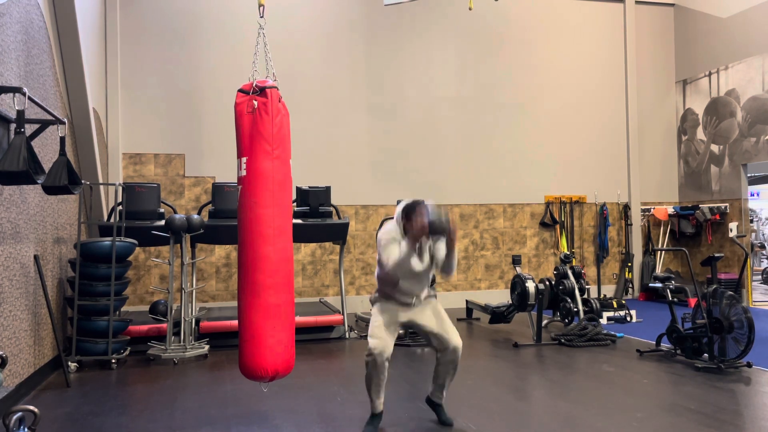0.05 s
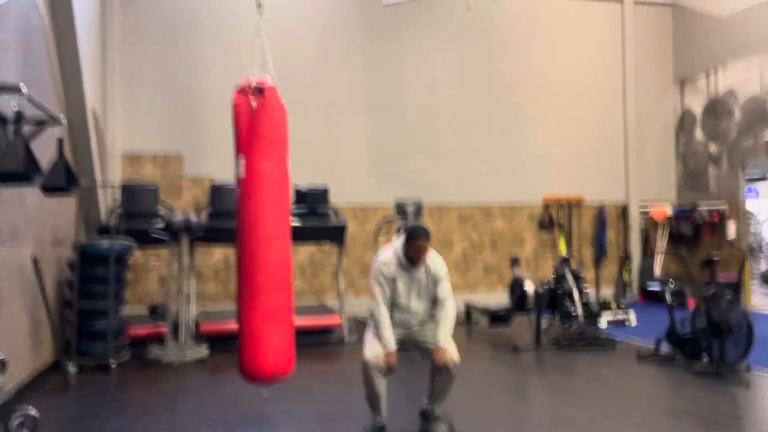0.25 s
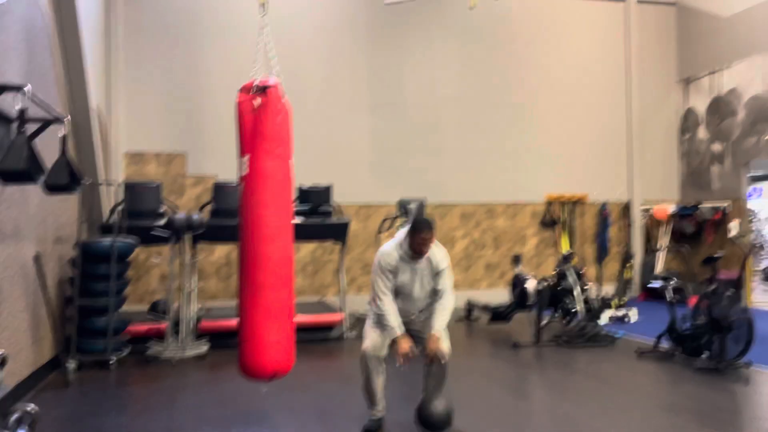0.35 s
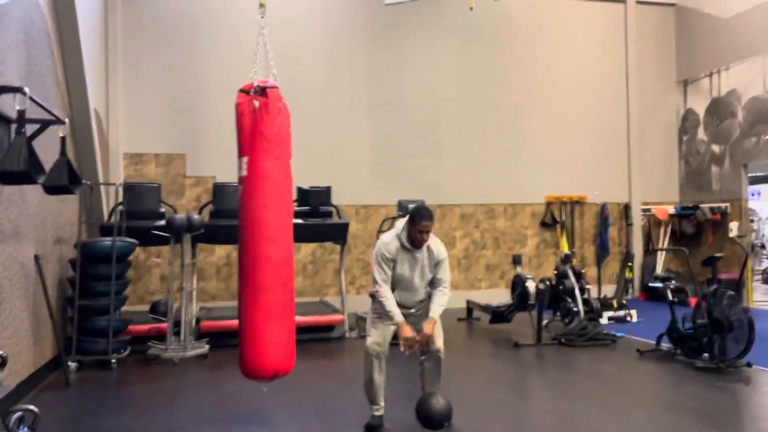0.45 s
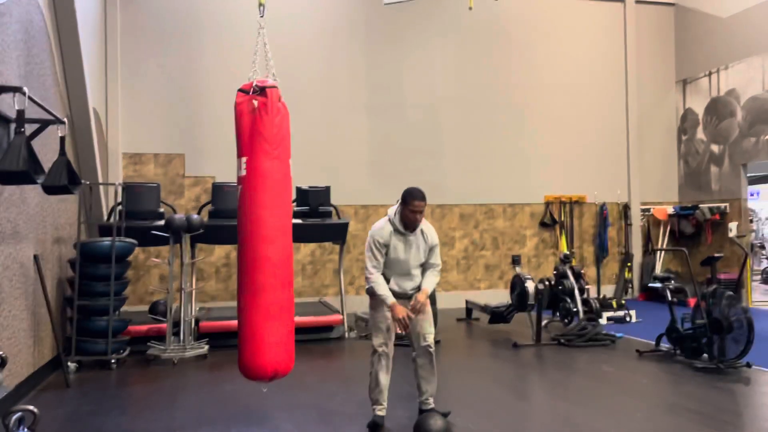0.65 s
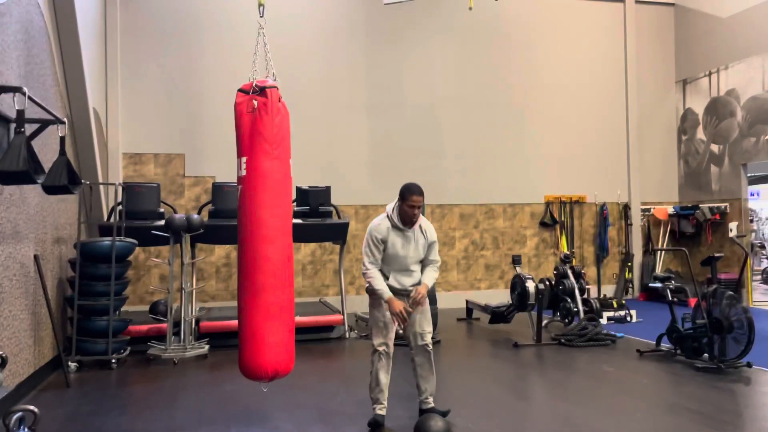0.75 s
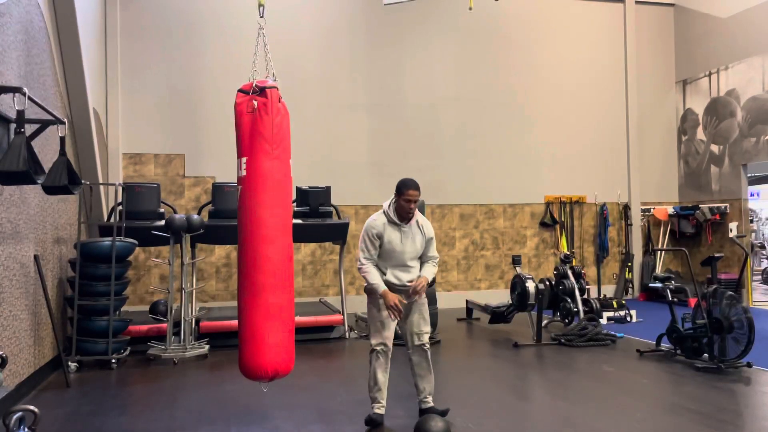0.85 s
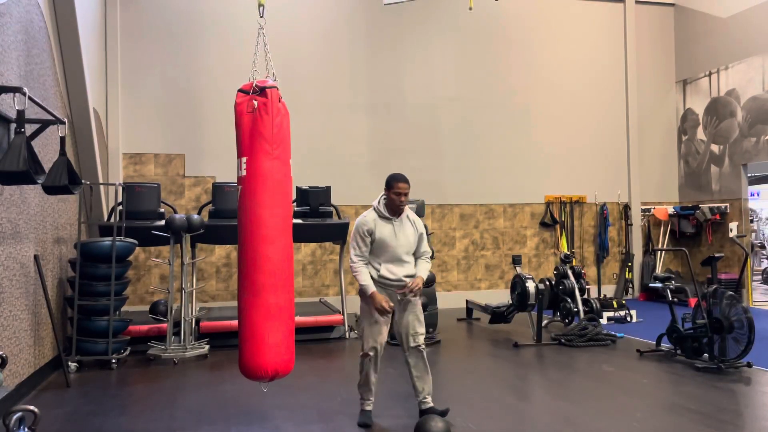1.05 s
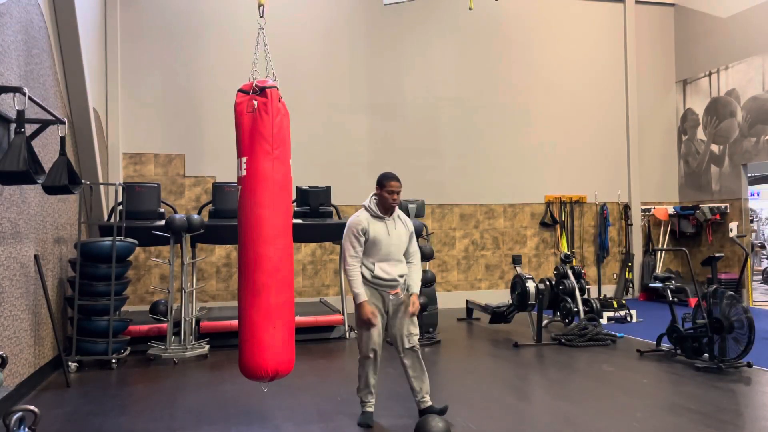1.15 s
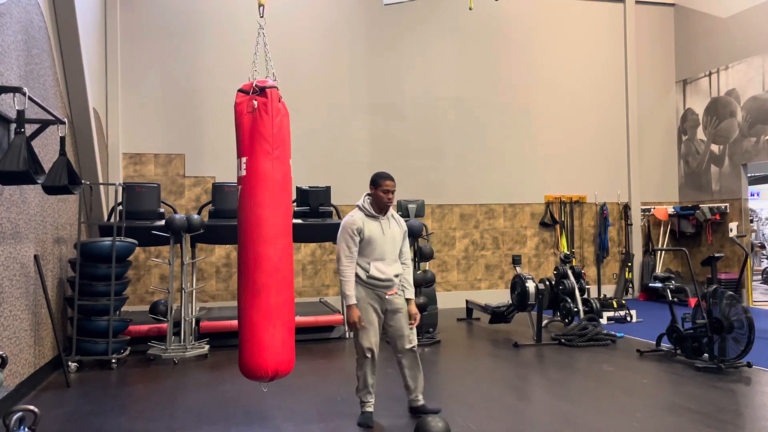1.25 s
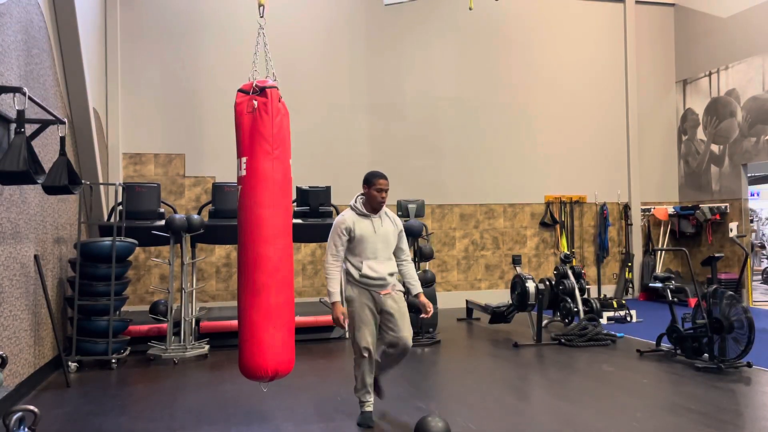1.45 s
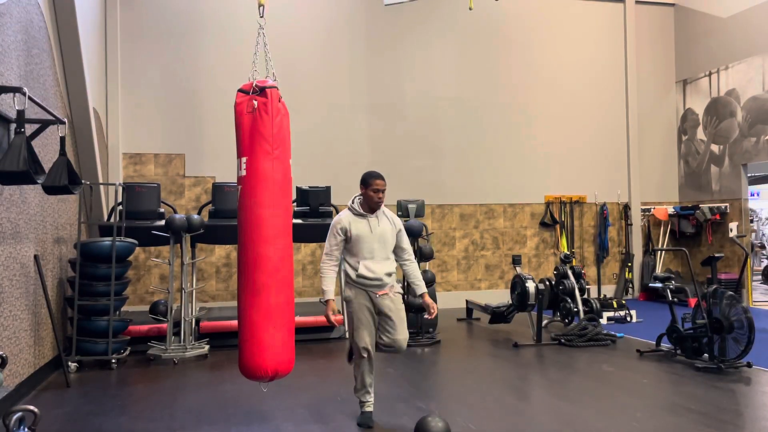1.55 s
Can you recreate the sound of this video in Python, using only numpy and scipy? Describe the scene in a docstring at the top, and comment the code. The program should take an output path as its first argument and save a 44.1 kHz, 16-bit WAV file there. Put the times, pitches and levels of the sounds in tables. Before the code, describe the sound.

In a big, humming gym, cloth rustles and feet land softly, then a weighted ball slams down loudly. Low echoes and long reverberation follow, a muted rebound drops, and clothes swish; phone at a few metres.

```python
"""Ventilation rushes and hums in a large gym; clothes swish, soft footfalls land and a shoe squeaks on a throw.
A heavy slam ball hits the rubber floor a few metres from a phone: a sharp pulse and rustle for the shell,
falling and decaying sines for the thud and the floor, and low swells for the echoes.
Banded noise makes the hall ring on; the ball lands once more after a low hop, softer and duller.
Cloth swishes again and a faint hollow tone swells and fades."""
import sys
import numpy as np
from scipy import signal
from scipy.fft import rfft, irfft
from scipy.io import wavfile
from scipy.ndimage import uniform_filter1d

SR = 44100
rng = np.random.default_rng(int(sys.argv[2]) if len(sys.argv) > 2 else 0)


def store_wav(level_fs):
    """Save 16-bit WAV to argv[1]."""
    pcm = np.round(np.clip(np.atleast_2d(level_fs), -1, 1) * 32767)
    wavfile.write(sys.argv[1], SR, pcm.T.astype(np.int16))


N = 70560
TOP_HZ = 15900  # upper limit of the sound


def undb(db):
    """Decibels to gain."""
    return 10 ** (np.asarray(db) / 20)


def read(table, hz, axis=1):
    """One column of a table, interpolated on a log-frequency axis."""
    rows = np.array(table, float)
    return np.interp(np.log(np.maximum(hz, 1)), np.log(rows[:, 0]), rows[:, axis])


def bins():
    """Frequencies of the spectrum in Hz."""
    return np.fft.rfftfreq(N, 1 / SR)


def since(start):
    """Seconds since start, zero before it."""
    return np.maximum(np.arange(N) / SR - start, 0)


def sine(hz, age):
    """Steady tone that starts from zero."""
    return np.sin(2 * np.pi * hz * age)


def fade(age, rise, t60):
    """Smooth attack, and a release that falls 60 dB in every t60 seconds."""
    attack = 1 - np.exp(-(age / rise) ** 2)
    return attack * undb(-60 * age / t60)


def pan(db):
    """Left and right gains for a left-minus-right difference in dB."""
    return undb(np.array([db, -db]).reshape(2, -1) / 2)


# stereo spread of the noises: (frequency [Hz], side minus mid [dB], left minus right [dB])
STEREO_WIDTH = [(61.3, -11.5, 3.5), (108, -13, 3.5), (198, -6.5, 2), (393, -2.5, 5.5), (664, 2, 1),
                (1270, -1, 1.5), (2410, -5.5, 2.5), (4500, -5, 4), (8600, 1, 0)]


def noise(table):
    """Random-phase stereo noise of unit RMS, its spectrum from the table and its width set by frequency."""
    hz = bins()
    mid, side = np.exp(2j * np.pi * rng.random((2, len(hz))))
    width = undb(read(STEREO_WIDTH, hz))
    pair = (mid + np.array([[1], [-1]]) * width * side) / np.hypot(1, width)
    balance = pan(read(STEREO_WIDTH, hz, axis=2))
    x = irfft(pair * undb(read(table, hz)) * balance, N)
    return x / np.sqrt(np.mean(x ** 2))


def causal(table):
    """Minimum-phase frequency response of a spectrum, by folding its cepstrum."""
    cepstrum = irfft(np.log(undb(read(table, bins()))), N)
    cepstrum[1:N // 2] *= 2
    cepstrum[N // 2 + 1:] = 0
    return np.exp(rfft(cepstrum))


# shell slapping flat on the floor: (frequency [Hz], relative density [dB per Hz])
SLAP_SPECTRUM = [(300, -16), (800, 1), (1500, 7.5), (2500, -3.5), (4500, -0.5), (6300, 5.5), (10000, 3.5),
                 (12500, -5), (15500, -23)]
# filling shifting and nearest surfaces answering: (frequency [Hz], relative density [dB per Hz])
RUSTLE_SPECTRUM = [(200, 2), (450, -5), (950, -8.5), (1600, -17.5), (3000, -18), (5500, -18.5),
                   (10000, -20), (15000, -38)]
LEFT_LAG_S, CRACK_PAN_DB = .000025, 2.5  # the left channel lags but is louder
CRACK_SMEAR_S, CRACK_SMEAR_HZ = .0008, 9000  # the low part of the crack comes a little later
RUSTLE_DB, RUSTLE_RISE_S, RUSTLE_T60_S = -8, 0.0011, 0.05
TILT_HZ = 3030  # the treble tilt sets in around here


def crack(start, tilt_db):
    """The shell slaps flat in one sharp pulse and a short rustle follows; the tilt dulls both."""
    hz = bins()
    lag = start + np.array([[LEFT_LAG_S], [0]]) + CRACK_SMEAR_S * np.exp(-hz / CRACK_SMEAR_HZ)
    # summing the delay over frequency gives the phase
    phase = 2 * np.pi * np.cumsum(lag, axis=1) * hz[1]
    slap = irfft(causal(SLAP_SPECTRUM) * np.exp(-1j * phase), N)
    slap = slap / np.abs(slap).max() * pan(CRACK_PAN_DB)
    rustle = noise(RUSTLE_SPECTRUM) * fade(since(start), RUSTLE_RISE_S, RUSTLE_T60_S)
    both = slap + undb(RUSTLE_DB) * rustle
    octaves = np.log2(np.hypot(1, hz / TILT_HZ))
    return irfft(rfft(both) * undb(tilt_db * octaves), N)


# modes of the floor: (frequency [Hz], level [dB], t60 [s], delay [s])
FLOOR_RESONANCES = [(53, -2, 0.15, 0.0195), (181.8, -6, 0.13, 0.043), (358, -18, 0.14, 0.0015)]
FLOOR_RISE_S = .007


def floor_boom(start):
    """The struck floor rings in a few damped low modes, each after its own delay."""
    out = 0
    for hz, db, t60, delay in FLOOR_RESONANCES:
        age = since(start + delay)
        out = out + undb(db) * sine(hz, age) * fade(age, FLOOR_RISE_S, t60)
    return out


# the shell meets the floor just before it slaps flat
TOUCH_LEAD_S, TOUCH_HZ, TOUCH_DB, TOUCH_T60_S = 0.0036, 620, -13, 0.012
# the air squeezed out from under the ball
SMACK_HZ, SMACK_DB, SMACK_RISE_S, SMACK_T60_S = 948, -5, 0.0012, 0.017
# the pitch falls as the ball flattens
THUD_START_HZ, THUD_END_HZ, THUD_GLIDE_S = 318, 165, 0.0025
THUD_DB, THUD_RISE_S, THUD_T60_S, THUD_PAN_DB = 13.8, 0.0084, 0.029, 3.5


def thud(start):
    """The ball touches, smacks, flattens with a falling pitch and sets the floor booming."""
    early, age = since(start - TOUCH_LEAD_S), since(start)
    touch = -undb(TOUCH_DB) * sine(TOUCH_HZ, early) * fade(early, 1 / SR, TOUCH_T60_S)
    smack = undb(SMACK_DB) * sine(SMACK_HZ, age) * fade(age, SMACK_RISE_S, SMACK_T60_S)
    glide = THUD_GLIDE_S * (1 - np.exp(-age / THUD_GLIDE_S))
    turns = THUD_END_HZ * age + (THUD_START_HZ - THUD_END_HZ) * glide
    body = -undb(THUD_DB) * np.sin(2 * np.pi * turns) * fade(age, THUD_RISE_S, THUD_T60_S)
    return (touch + smack + body + floor_boom(start)) * pan(THUD_PAN_DB)


# low echoes from around the hall: (delay [s], pitch [Hz], level [dB], half-length [s])
HALL_ECHOES = [(.064, 485, -25, .012), (.085, 74.5, -15.5, 0.011), (.124, 150, -14, 0.012),
               (.146, 340, -22, 0.02), (.185, 233, -13.5, 0.0036), (.205, 66, -21, 0.015),
               (.24, 175, -17.5, 0.038), (.275, 52, -18.5, 0.015), (.33, 78, -15, 0.0079)]
ECHO_PAN_DB = 0.5


def echoes(start):
    """The boom comes back from around the hall in separate low swells, each with its own pitch."""
    out = 0
    for delay, hz, db, half_length in HALL_ECHOES:
        t = np.arange(N) / SR - start - delay
        out = out + undb(db) * np.cos(2 * np.pi * hz * t) * np.exp(-(t / half_length) ** 2)
    return out * pan(ECHO_PAN_DB)


# reverberation of the hall: (frequency [Hz], relative density [dB per Hz], t60 [s])
REVERBERATION = [(25, -19.5, 0.85), (46.3, 4.5, 1.4), (106, 1, 1.73), (181, 0.5, 2.36), (361, -8.5, 1.92),
                 (468, -14, 2), (980, -13.5, 2.07), (1540, -17, 2.26), (1710, -24, 1.94),
                 (2890, -25, 1.645), (5100, -29, 1.13), (10300, -28.5, 0.51), (16300, -67, 0.66)]
HALL_DB, HALL_RISE_S = -19.5, 0.00043
HALL_RISE_CYCLES = 10  # the build-up is slower in the bass
HALL_HOLD_S = 0.32  # for the longest t60, in proportion for shorter ones


def hall(start, count=20):
    """Dense reflections fill the hall, hold, then die away at a rate set by frequency."""
    age, field = since(start), rfft(noise(REVERBERATION))
    centres = np.geomspace(25, TOP_HZ, count)
    longest = np.array(REVERBERATION)[:, 2].max()
    out = 0
    for hz, pick in zip(centres, np.eye(count)):
        t60 = read(REVERBERATION, hz, axis=2)
        hold = HALL_HOLD_S * t60 / longest
        # overlapping triangular bands add up to the whole field
        band = irfft(field * read(np.c_[centres, pick], bins()), N)
        build = 1 - np.exp(-age / (HALL_RISE_S + HALL_RISE_CYCLES / hz))
        decay = undb(-60 * (np.hypot(age, hold) - hold) / t60)
        out = out + band * build * decay
    return undb(HALL_DB) * out


# cloth rubbing: (frequency [Hz], relative density [dB per Hz])
CLOTH_SPECTRUM = [(500, -3), (1200, -3.5), (2200, -11), (5000, -9.5), (10000, -5), (15000, -28)]
# swishes: (time [s], level [dB], rise [s], t60 [s])
CLOTH_SWISHES = [(0.062, -47.5, 0.018, 0.1), (0.143, -36.5, 0.015, 0.6), (.87, -48, 0.086, 0.48),
                 (1.28, -37.5, 0.14, 0.33)]


def clothes():
    """Cloth swishes as noise on the throw, then as the thrower straightens up and steps."""
    level = 0
    for start, db, rise, t60 in CLOTH_SWISHES:
        level = level + undb(db) * fade(since(start), rise, t60)
    return noise(CLOTH_SPECTRUM) * level


# shoe squeaks: (time [s], length [s], mean pitch [Hz], level [dB])
SHOE_SQUEAKS = [(0.135, 0.0255, 948, -43), (0.154, 0.032, 596, -30), (0.184, 0.033, 642, -40)]
SQUEAK_SAG, SQUEAK_ROUGH = .26, .05  # total fall and random wobble, as shares of the pitch


def squeaks():
    """A shoe gives short, rough squeaks of sagging pitch."""
    out = 0
    for start, length, hz, db in SHOE_SQUEAKS:
        part = np.minimum(since(start) / length, 1)
        wobble = uniform_filter1d(rng.standard_normal(N), size=80)
        pitch = hz * (1 - SQUEAK_SAG * (part - .5) + SQUEAK_ROUGH * wobble / wobble.std())
        tone = np.sin(2 * np.pi * np.cumsum(pitch) / SR)
        out = out + undb(db) * np.sin(np.pi * part) ** 2 * tone
    return out


# footfalls: (time [s], pitch [Hz], level [dB])
FOOTFALLS = [(0.075, 177, -25), (0.193, 58, -25.5)]
THUMP_RISE_S, THUMP_T60_S = 0.0026, 0.17


def thumps():
    """Soft, dull footfalls, each a decaying low sine."""
    out = 0
    for start, hz, db in FOOTFALLS:
        age = since(start)
        out = out + undb(db) * sine(hz, age) * fade(age, THUMP_RISE_S, THUMP_T60_S)
    return out


# faint hollow tone in the hall: (frequency [Hz], relative density [dB per Hz])
HOLLOW_TONE = [(300, -34), (440, -12), (520, 12), (615, 7.5), (720, -24), (1000, -58)]
SWELL_S, SWELL_WIDTH_S, SWELL_DB = 1.2, 0.12, -40.5  # time of the peak, half-length, level
SWELL_WAVER_HZ, SWELL_WAVER_DB = 15.5, 0.5


def swell():
    """A faint hollow tone of narrow noise comes and goes, wavering in level."""
    t = since(0) - SWELL_S
    waver_db = SWELL_WAVER_DB * np.cos(2 * np.pi * SWELL_WAVER_HZ * t)
    return undb(SWELL_DB + waver_db) * noise(HOLLOW_TONE) * np.exp(-(t / SWELL_WIDTH_S) ** 2)


# rush of the ventilation: (frequency [Hz], relative density [dB per Hz])
AIR_RUSH = [(20, 1), (48, 5), (80, 3), (125, 0), (190, -1), (280, -6), (420, -12), (800, -14),
            (1500, -21.5), (2000, -27), (4000, -36.5), (5800, -38.5), (10000, -49), (15000, -86)]
# hum and whines of the ventilation: (frequency [Hz], RMS level [dB])
HUM_AND_WHINES = [(51, -43), (118.4, -44), (279.9, -46.5), (4764, -76.5), (5647, -78), (5884, -90),
                  (10282, -83.5)]
AIR_DB = -36
HUM_DRIFT = .001  # share of the pitch


def ventilation():
    """A steady noise of rushing air, with hum and thin whines as sines slightly unsteady in pitch."""
    out = undb(AIR_DB) * noise(AIR_RUSH)
    for hz, db in HUM_AND_WHINES:
        drift = uniform_filter1d(rng.standard_normal(N), size=2000)
        turns = np.cumsum(hz * (1 + HUM_DRIFT * drift / drift.std())) / SR
        out = out + undb(db) * np.sqrt(2) * np.sin(2 * np.pi * (turns + rng.random()))
    return out


# landings of the ball, with a gain for each layer:
# (time [s], crack [dB], thud and echoes [dB], hall [dB], treble tilt of the crack [dB per octave])
BALL_LANDINGS = [(0.2287, 0.5, -1.5, 1, -1.5), (0.5952, -13, -31.5, -42, -10.5)]


def scene():
    """The throw, the landings and the hall around them."""
    out = ventilation() + clothes() + squeaks() + thumps() + swell()
    for start, crack_db, thud_db, hall_db, tilt_db in BALL_LANDINGS:
        out = out + undb(crack_db) * crack(start, tilt_db)
        out = out + undb(thud_db) * (thud(start) + echoes(start))
        out = out + undb(hall_db) * hall(start)
    return out


# overall tone colour, with a notch in the treble: (frequency [Hz], gain [dB])
TONE_COLOUR = [(20, 0), (42, 4), (6200, 0), (7100, -18), (7900, -20.5), (8800, -4.5), (16000, 7)]


def record(dry):
    """A notch near 7.5 kHz colours the treble; the peaks are capped and the top is cut."""
    coloured = irfft(rfft(dry) * causal(TONE_COLOUR), N)
    capped = np.clip(coloured, -1, 1)
    top_cut = signal.ellip(8, .2, 70, TOP_HZ, fs=SR, output="sos")
    return signal.sosfilt(top_cut, capped)


dry = scene()
out = record(dry)
store_wav(out)
```